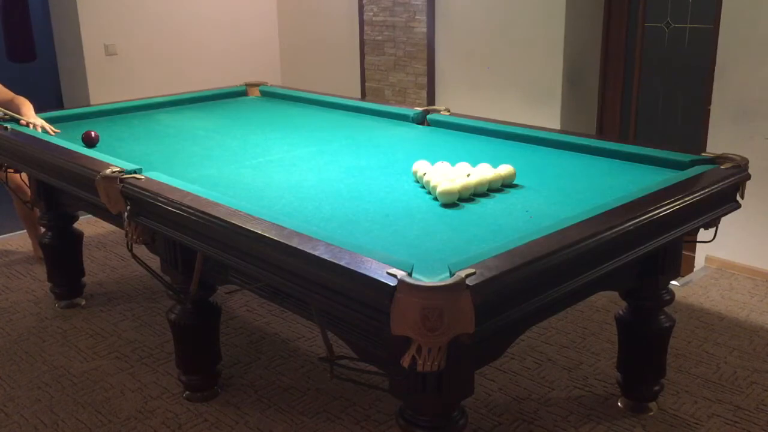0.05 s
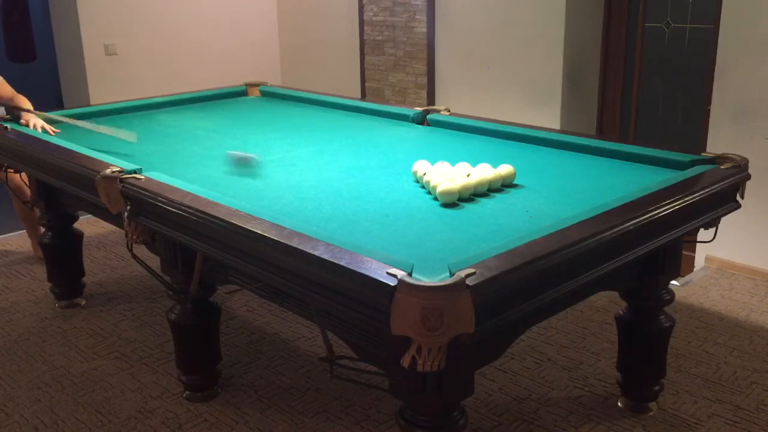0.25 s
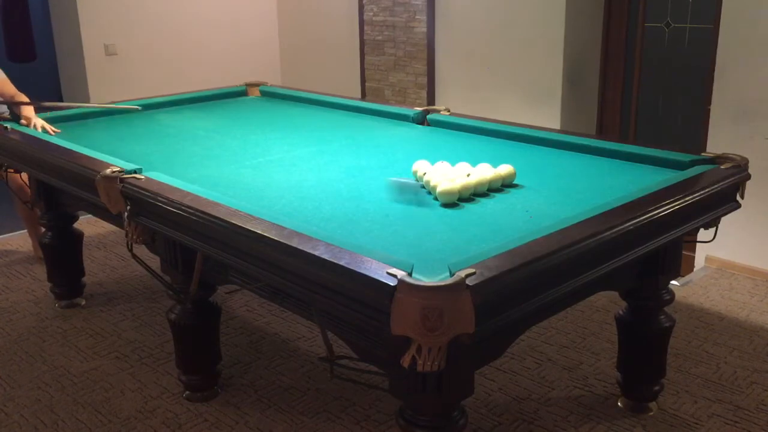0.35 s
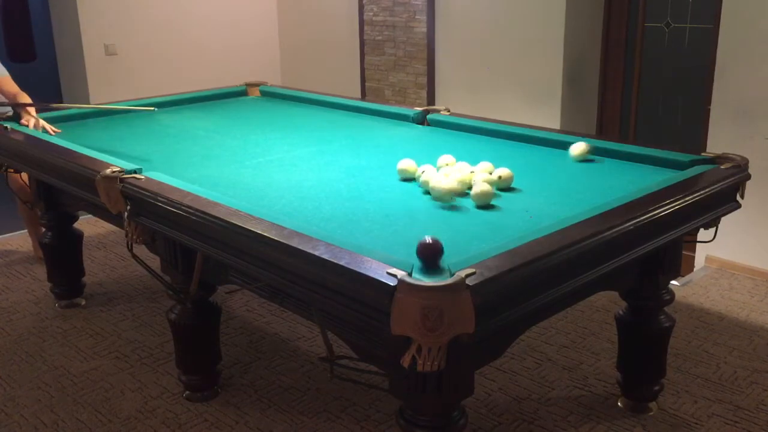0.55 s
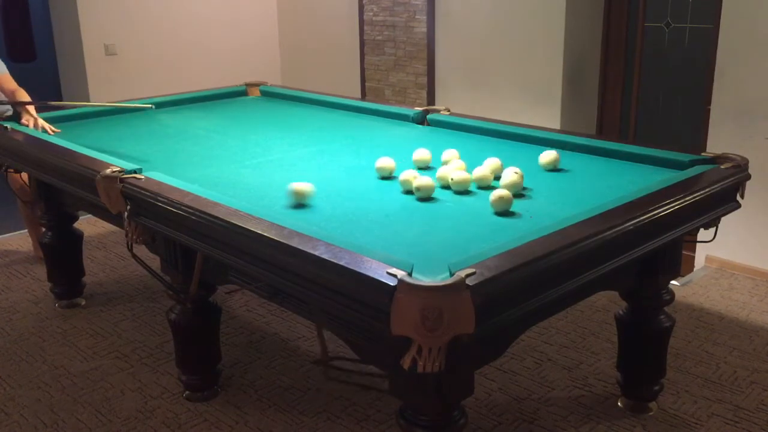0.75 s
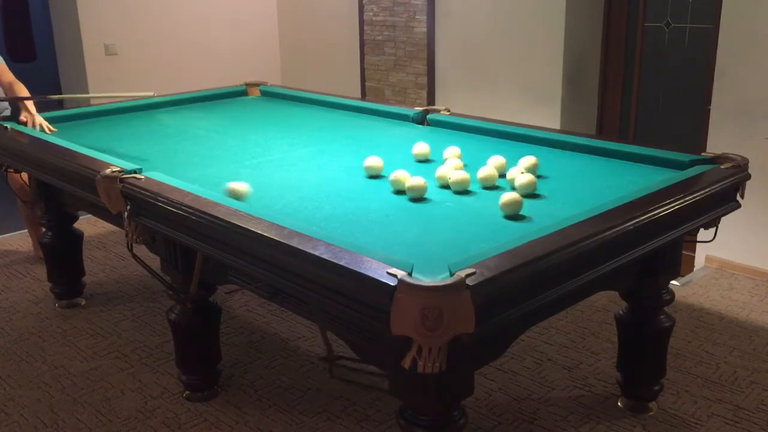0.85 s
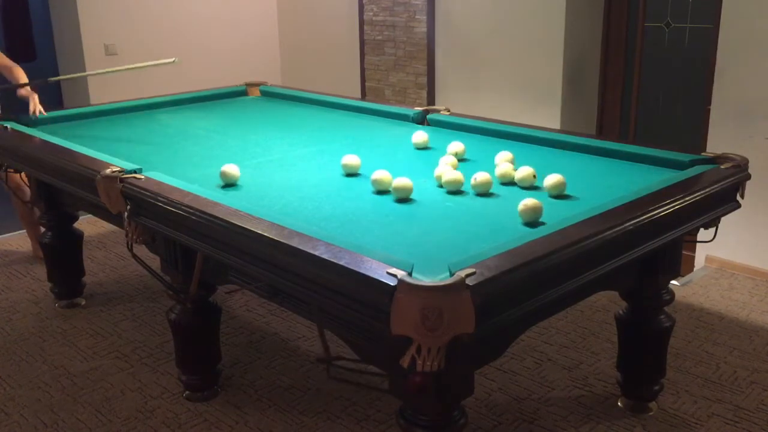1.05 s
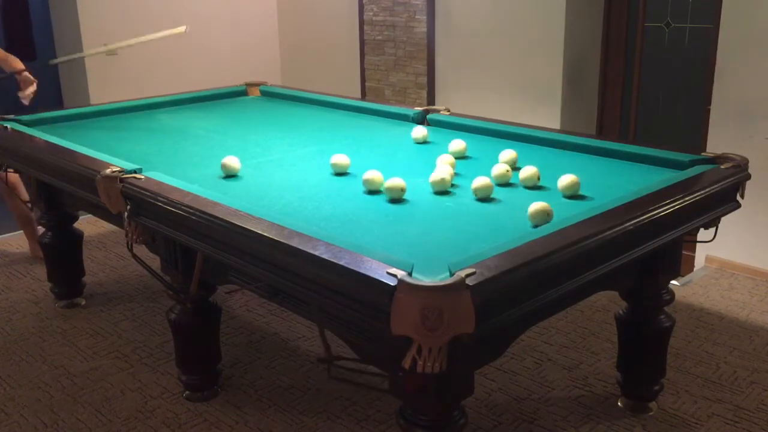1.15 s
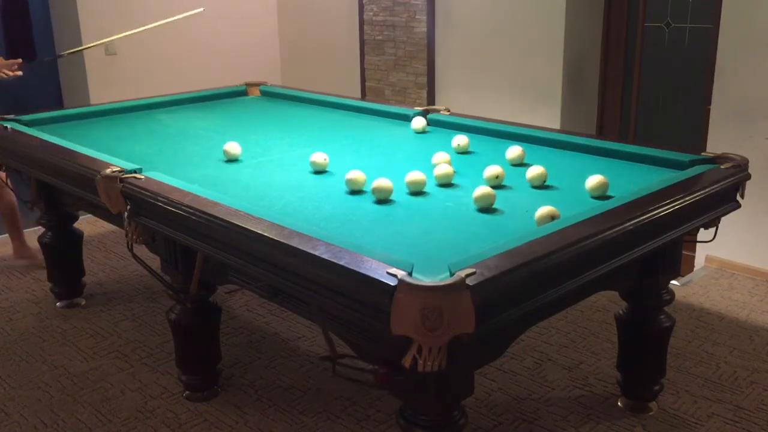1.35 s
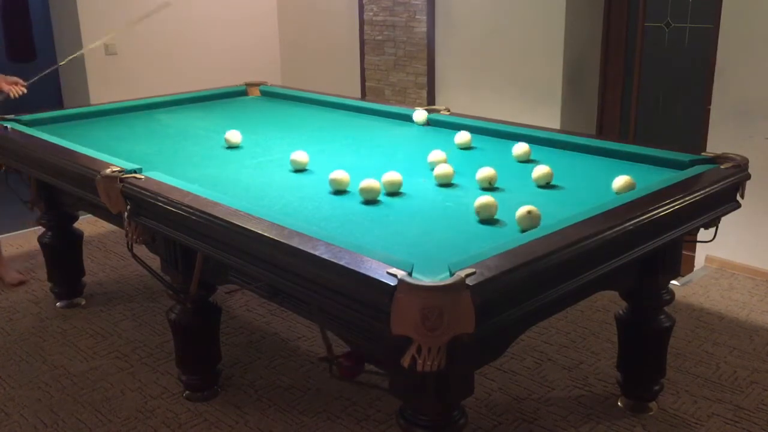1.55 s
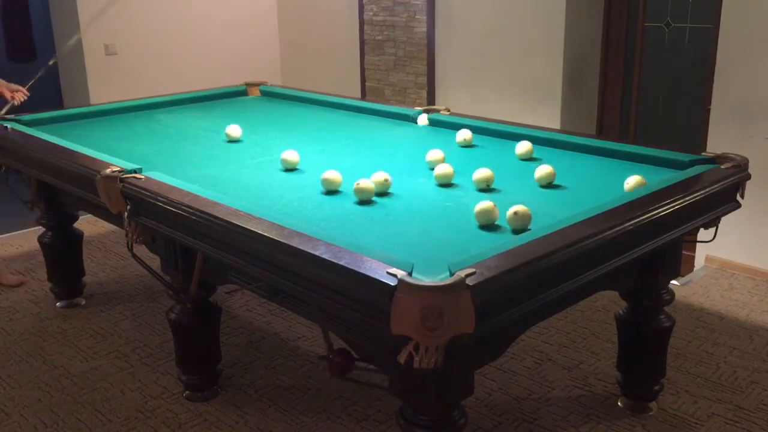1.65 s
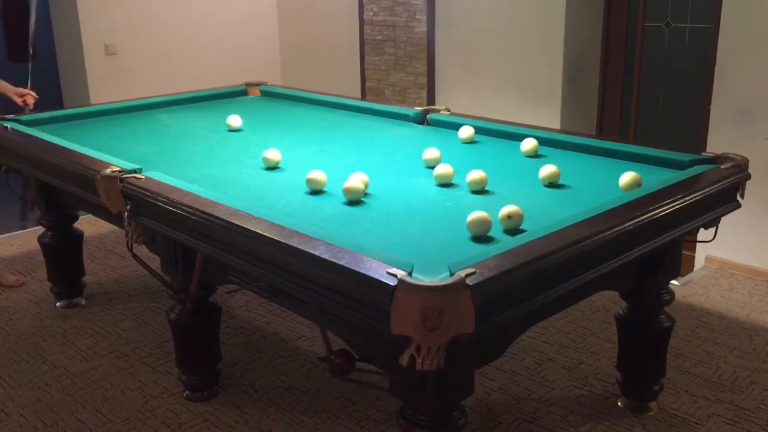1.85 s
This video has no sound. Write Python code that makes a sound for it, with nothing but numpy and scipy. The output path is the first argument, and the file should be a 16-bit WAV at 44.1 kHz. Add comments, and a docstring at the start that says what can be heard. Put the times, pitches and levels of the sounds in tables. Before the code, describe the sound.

A billiard break sounds in a small, hard-walled room. At 0.25 seconds the cue cracks and rings, starting a low rolling rumble. Near 0.5 the rack bursts in very loud clicks that overload the microphone. Single clicks follow at 0.7 and 1.1, among fading cushion thuds and soft rustles. A soft wooden knock comes at 1.7, then a faint click and a last rustle near 1.9.

```python
"""A break on a large billiard table in a small, hard-walled room. Over quiet air and a faint scuff, the cue
cracks against the ball and its shaft rings. Rolling sets the table droning, a cushion thuds, and the rack
bursts in elastic collisions whose loudest clicks are flattened at their peaks. Single balls then click together
and thud into the cushions, while soft rustles and scuffs follow as the player straightens up. Near the end come
a soft wooden knock, a faint click and a last rustle."""
import sys
import numpy as np
from scipy import signal
from scipy.fft import rfft, irfft
from scipy.io import wavfile

SR = 44100
rng = np.random.default_rng(int(sys.argv[2]) if len(sys.argv) > 2 else 0)


def transcribe(u):
    """Save the signal u as a 16-bit wav file named by the first command-line argument.

    u: samples, shape (n,) or (channels, n), limited to [-1, 1]; the rate is SR.
    q: integer samples, one column per channel.
    """
    v = np.clip(np.atleast_2d(u).T, -1, 1)
    q = np.round(v * 32767).astype(np.int16)
    wavfile.write(sys.argv[1], SR, q)


N = 83790


def undb(db):
    """Amplitude ratio of a level in decibels."""
    return 10 ** (np.asarray(db) / 20)


def unit(x):
    """Normalisation to rms 1."""
    return x / np.sqrt(np.mean(x ** 2))


def clock():
    """Time of each sample [s]."""
    return np.arange(N) / SR


def bins():
    """Frequency of each Fourier bin [Hz]."""
    return np.arange(N // 2 + 1) * SR / N


def on_log(points, hz):
    """Interpolation of (frequency, value) points on a logarithmic frequency axis."""
    p = np.array(points)
    return np.interp(np.log(hz + 1), np.log(p[:, 0]), p[:, 1])


def decay(t, t60):
    """Exponential damping: 60 dB lost in t60 seconds."""
    return np.exp(-np.log(1000) * t / t60)


def resonance(hz, width_hz):
    """Single-pole resonance with gain 1 at its centre."""
    return 1 / (1 + 2j * (bins() - hz) / width_hz)


def noise(gain):
    """Spectrally shaped Gaussian noise, rms 1."""
    return unit(irfft(rfft(rng.standard_normal(N)) * gain, N))


def wander(rate_hz):
    """Slow random drift: low-pass noise, rms 1."""
    return noise(np.exp(-(bins() / rate_hz) ** 2))


def pulse(gain):
    """Minimum phase: the most compact causal pulse with a given spectrum, peak 1."""
    cepstrum = irfft(np.log(gain), N)
    cepstrum[1:N // 2] *= 2
    cepstrum[N // 2 + 1:] = 0
    x = irfft(np.exp(rfft(cepstrum)), N)
    return x / np.abs(x).max()


def add(out, x, start_s):
    """Superposition of a delayed sound."""
    i = int(np.clip(start_s * SR, 0, N - 1))
    out[i:] += x[:N - i]


# spectrum of the room's background (frequency [Hz], level [dB])
AIR_SPECTRUM = [(18, -40.5), (30, -14.5), (109, 0.5), (233, -17), (1220, -20.5), (1720, -19.5), (7470, -28),
                (12600, -30.5), (16000, -26)]
def air():
    """Stationary noise: a low murmur with a faint hiss."""
    return undb(-67.5) * noise(undb(on_log(AIR_SPECTRUM, bins())))


# rubs (time [s], level [dB], attack [s], decay time T60 [s], tilt [dB/octave], cutoff [Hz])
RUBS = [(0.217, -51, 0.014, .1, -2.5, 12200), (.77, -38, 0.015, 0.31, -4.5, 14000),
        (1.118, -48.5, .002, .06, 5, 13900), (1.163, -39, 0.003, 0.36, -2.5, 12000),
        (1.255, -41.5, 0.0054, .25, -4, 13000), (1.33, -50, 0.13, 0.59, -5, 9100),
        (1.559, -44, 0.076, 0.72, -4, 8400), (1.705, -39.5, 0.012, 0.38, -0.5, 14000),
        (1.878, -32.5, .016, 0.4, 5, 18000)]
# friction spectrum before tilting (frequency [Hz], level [dB])
RUB_SPECTRUM = [(100, -16.5), (700, -13.5), (1700, 3), (4000, -3), (6000, -9.5), (8500, -4), (10500, -11.5),
                (16000, -9)]
def scuffs():
    """Sliding friction radiates broadband noise that swells and dies away."""
    out, t = np.zeros(N), clock()
    for start, db, attack, t60, tilt_db, top_hz in RUBS:
        spectrum = undb(on_log(RUB_SPECTRUM, bins()) + tilt_db * np.log2(bins() + 1))
        rub = noise(spectrum / np.hypot(1, (bins() / top_hz) ** 4))
        envelope = np.minimum(t / attack, 1) * decay(np.maximum(t - attack, 0), t60)
        add(out, undb(db) * envelope * rub, start)
    return out


# spectrum of the tip's impact (frequency [Hz], level [dB])
TIP_SPECTRUM = [(40, -28.5), (200, -16), (400, 3.5), (650, 7.5), (850, -5), (1050, -8), (1800, -0.5),
                (2800, 1), (4500, -11.5), (7000, -12.5), (10000, -19), (16000, -34)]
# modes of the cue shaft (frequency [Hz], level [dB], decay time T60 [s])
SHAFT_MODES = [(830, 0, .14), (1179, -3, .2), (1625, -4, .22), (1879, -1, .26), (2392, 4.5, .37),
               (2420, -5, .42), (2950, -8, .36), (3849, -6, .45), (3905, -10, .55), (5582, -16, .29),
               (6450, -15, .3), (7500, -16, .25)]
def cue():
    """Impact excitation: the tip knocks the ball, the shaft rings and the ball thumps on the slate."""
    out = np.zeros(N)
    knock = room(pulse(undb(on_log(TIP_SPECTRUM, bins()))), walls(), wet_db=16.5)
    shaft = modes(SHAFT_MODES)
    thump = modes([(800, -6, 0.032)])
    add(out, undb(-6) * knock + undb(-18.5) * shaft + thump, start_s=0.2405)
    return out


ROOM_BUILD_S = 0.0013
def modes(table):
    """Free vibration: a sum of damped sinusoids, swelling briefly as the room takes them up."""
    t = clock()
    ringing = sum(undb(db) * np.sin(2 * np.pi * hz * t) * decay(t, t60) for hz, db, t60 in table)
    return ringing * (1 - np.exp(-t / ROOM_BUILD_S))


# decay of the room (frequency [Hz], reverberation time T60 [s])
REVERB_TIMES = [(60, 1), (300, 0.89), (800, 0.49), (2000, 0.57), (4000, 0.42), (8000, 0.35), (16000, 0.23)]
# colour of the reverberation (frequency [Hz], level [dB])
REVERB_SPECTRUM = [(100, -2), (1000, 2.5), (2100, -2.5), (3100, -4), (5000, 3), (9000, -0.5), (16000, -0.5)]
def walls():
    """Diffuse reverberation with energy 1; absorption removes the treble first."""
    t, tail = clock(), 0
    hiss = rfft(rng.standard_normal(N)) * undb(on_log(REVERB_SPECTRUM, bins()))
    centres = np.geomspace(60, 16000, 9)
    for hz, pick in zip(centres, np.eye(len(centres))):
        band = irfft(hiss * on_log(np.c_[centres, pick], bins()), N)  # triangular passband
        tail = tail + band * decay(t, on_log(REVERB_TIMES, hz))
    return unit(tail * (1 - np.exp(-t / ROOM_BUILD_S))) / np.sqrt(N)


def scatter(spread_s):
    """Scattering: a short cluster of reflections with energy 1."""
    t = clock()
    return unit(rng.standard_normal(N) * t * np.exp(-2 * t / spread_s)) / np.sqrt(N)


CEILING_CUTOFF_HZ = 3466
def room(x, tail, wet_db):
    """Multipath propagation: direct sound, scatter from slate and rails, a dull ceiling echo, the tail."""
    response = undb(wet_db) * tail + undb(-3.5) * scatter(spread_s=0.002)
    ceiling = irfft(rfft(scatter(spread_s=0.00067)) * resonance(0, 2 * CEILING_CUTOFF_HZ), N)
    add(response, undb(-4.5) * ceiling, start_s=0.02)
    return x + signal.fftconvolve(x, response)[:N]


# modes of the table body (frequency [Hz], level [dB])
TABLE_MODES = [(86, -4.5), (112.5, 3), (142, -8)]
# course of the rolling (time [s], drone level [dB], rumble level [dB])
ROLL_LEVELS = [(0, -109, -111), (0.223, -68, -64), (0.251, -33, -30), (.45, -40, -31.5), (.6, -32.5, -30),
               (.88, -32.5, -39.5), (1.001, -32.5, -39), (1.3, -38, -42.5), (1.45, -41.5, -56.5),
               (1.609, -48.5, -73.5), (1.67, -57.5, -39.5), (1.742, -33.5, -37), (1.9, -35.5, -44)]
# spectrum of balls on cloth (frequency [Hz], level [dB])
RUMBLE_SPECTRUM = [(25, -14.5), (50, -9), (110, 6.5), (190, -19.5), (290, 5), (400, 1.5), (560, -10),
                   (800, -13), (1500, -22), (4000, -32.5), (16000, -66)]
WANDER_HZ, FLUTTER_DB, DRIFT_RATE_HZ = 4.8, 3, 11
def rolling():
    """Forced vibration: balls rumble over the cloth and keep the table's low modes droning and beating."""
    times, drone_db, rumble_db = np.array(ROLL_LEVELS).T
    t, drone = clock(), 0
    for hz, db in TABLE_MODES:
        phase = 2 * np.pi * np.cumsum(hz + WANDER_HZ * wander(DRIFT_RATE_HZ)) / SR
        drone = drone + undb(db + FLUTTER_DB * wander(DRIFT_RATE_HZ)) * np.sin(phase)
    drone = unit(drone) * undb(np.interp(t, times, drone_db))
    rumble = noise(undb(on_log(RUMBLE_SPECTRUM, bins())))
    return drone + rumble * undb(np.interp(t, times, rumble_db))


# ball against cushion (time [s], level [dB], hardness [frequency ratio])
CUSHION_HITS = [(.405, 2.5, 0.92), (.555, 9, 1.074), (.585, 5, 0.845), (.722, 7.5, 0.85),
                (0.751, -0.5, 0.69), (0.876, -10.5, 0.6), (1.121, -10.5, 1.08), (1.273, -14, 0.6),
                (1.665, -12, 1.1)]
# spectrum of a blow on rubber (frequency [Hz], level [dB])
CUSHION_SPECTRUM = [(40, -19), (110, 7.5), (180, -10.5), (300, -4.5), (550, 6.5), (750, -6.5),
                    (1200, -13.5), (3000, -45.5), (16000, -73)]
THUD_DB = -24
def cushions():
    """Compliant impact: rubber lengthens the contact, softening each blow to a dull thud."""
    out, tail = np.zeros(N), walls()
    for start, db, hardness in CUSHION_HITS:
        thud = pulse(undb(on_log(CUSHION_SPECTRUM, bins() / hardness)))
        add(out, undb(THUD_DB + db) * room(thud, tail, wet_db=6.5), start)
    return out


# ball against ball (time [s], level [dB], hardness [frequency ratio], treble shelf [dB],
# reverberation [dB], high ring [dB], rattle [dB])
COLLISIONS = [(.4655, 14.5, 1.113, 8.5, -6, 3.5, -5.5), (0.4671, 11.5, 1.06, 2, -5, 8, 1.5),
              (0.469, 9.5, 1.023, 2, 0.5, -2, 0), (0.479, 12.5, 0.96, -0.5, -11, 0, -4),
              (0.4846, 7.5, 1.06, -1.5, -1, -9, 0), (0.4918, 4.5, 1.1, -10, -7.5, 2, 0.5),
              (0.504, 0, 1.02, -6.5, -15, -6, 2.5), (0.6654, 5.5, 1.005, -0.5, 0, 1.5, -13),
              (1.0595, 5, 0.98, -2, -5, -5, -21), (1.8276, -20.5, 0.79, -5, 4.5, -12, -26)]
# spectrum of one contact (frequency [Hz], level [dB])
CONTACT_SPECTRUM = [(40, -36), (200, -32), (700, -14.5), (1000, -11), (1450, -0.5), (2200, 0.5),
                    (2900, -7.5), (3500, -16), (4500, -40), (6500, -37), (9000, -35), (16000, -54.5)]
CLICK_DB, CLICK_ROOM_DB, RING_DB, SHELF_HZ = -3, 5, -28, 4800
def balls():
    """Elastic collision: a click with a faint ring; the pulse rattles to and fro between touching balls."""
    out, tail = np.zeros(N), walls()
    ring = np.abs(resonance(hz=11950, width_hz=1500)) ** 2
    rattle = np.abs(resonance(hz=2310, width_hz=1000)) ** 2
    shelf = .5 + .5 * np.tanh(2 * np.log2((bins() + 1) / SHELF_HZ))
    for start, db, hardness, treble_db, room_db, ring_db, rattle_db in COLLISIONS:
        contact = undb(on_log(CONTACT_SPECTRUM, bins() / hardness) + treble_db * shelf)
        contact *= 1 + undb(rattle_db) * rattle
        click = pulse(np.hypot(contact, undb(RING_DB + ring_db) * ring))
        add(out, undb(CLICK_DB + db) * room(click, tail, CLICK_ROOM_DB + room_db), start)
    return out


# modes of knocked wood (frequency [Hz], level [dB], decay time T60 [s])
WOOD_MODES = [(200, -8, 1.4), (253, -5, .9), (383, -3, .5), (432, -5, .2), (511, -4, .22), (567, 1, .22),
              (640, 0, .22), (721, -8, .25)]
def wood():
    """Modal decay after a soft knock: the lowest mode is least damped and lingers."""
    out = np.zeros(N)
    add(out, undb(-37) * modes(WOOD_MODES), start_s=1.665)
    return out


def scene():
    """Linear superposition of all sources in one channel."""
    return (air() + scuffs() + cue() + rolling() + cushions() + balls() + wood())[None]


OVERLOAD_KNEE, TOP_HZ = 5, 16000
def record(dry):
    """Soft limiting and band limiting: the loudest peaks are flattened and the top is cut."""
    squashed = dry / (1 + np.abs(dry) ** OVERLOAD_KNEE) ** (1 / OVERLOAD_KNEE)
    lowpass = signal.ellip(8, .2, 70, TOP_HZ, fs=SR, output="sos")
    return signal.sosfilt(lowpass, squashed)


dry = scene()
out = record(dry)
transcribe(out)
```